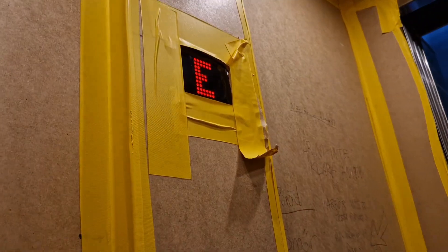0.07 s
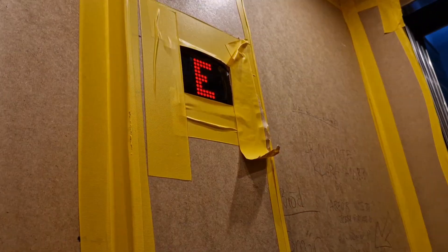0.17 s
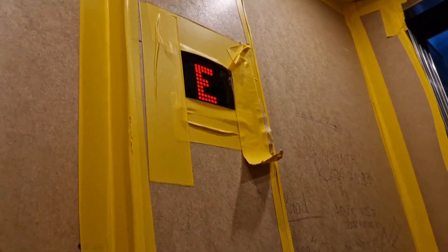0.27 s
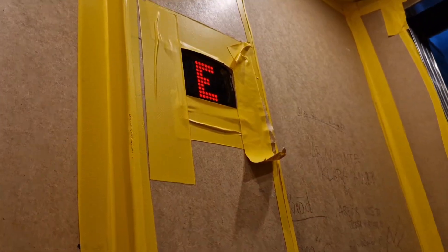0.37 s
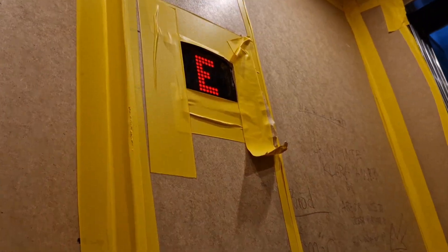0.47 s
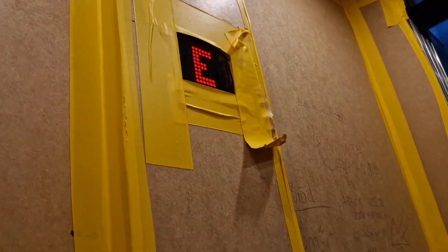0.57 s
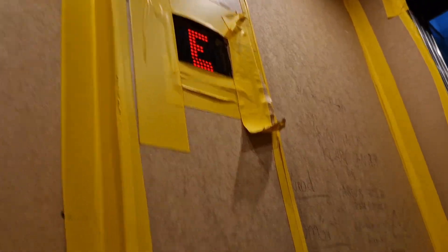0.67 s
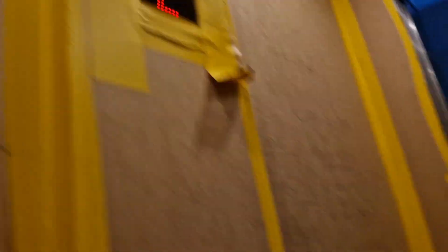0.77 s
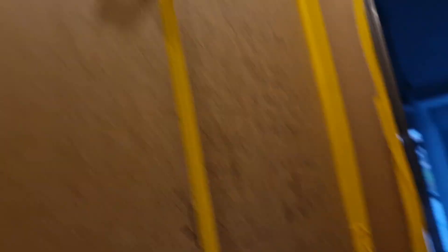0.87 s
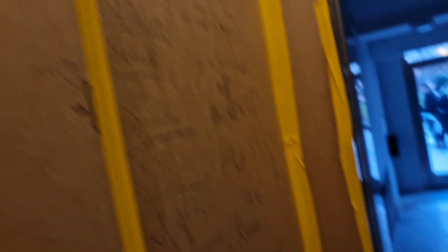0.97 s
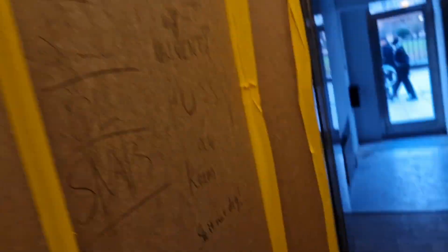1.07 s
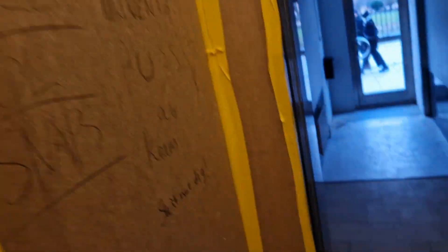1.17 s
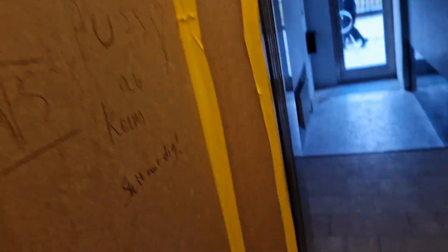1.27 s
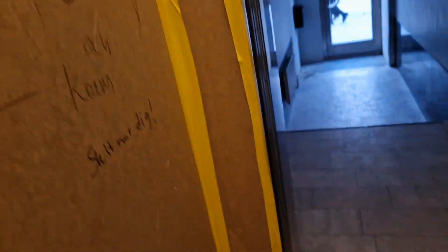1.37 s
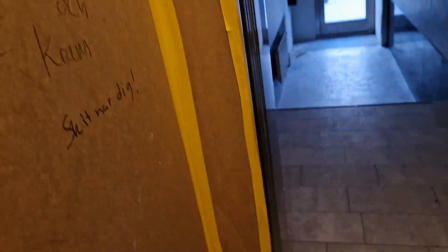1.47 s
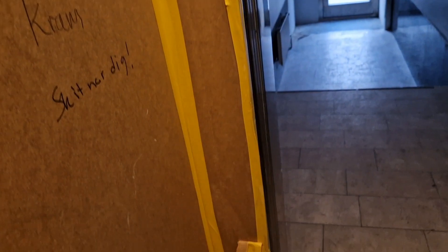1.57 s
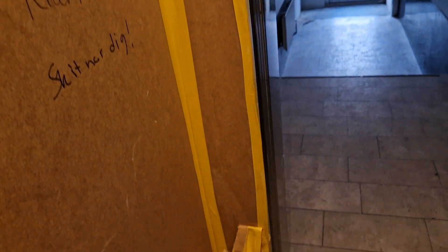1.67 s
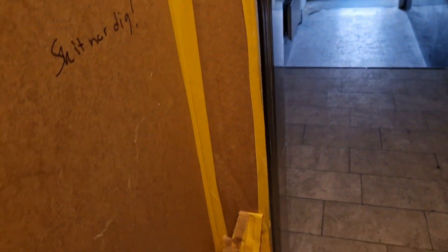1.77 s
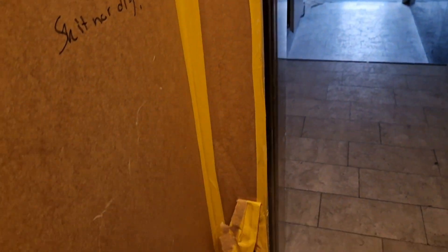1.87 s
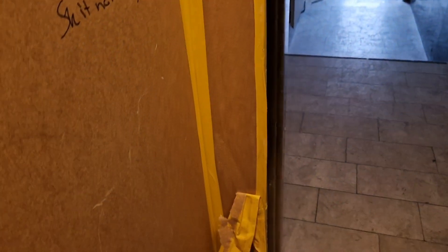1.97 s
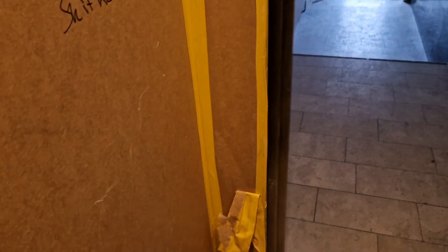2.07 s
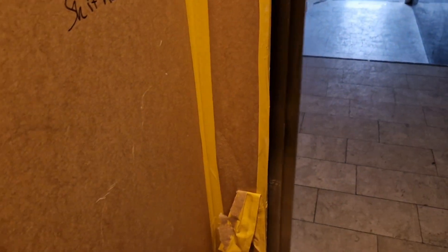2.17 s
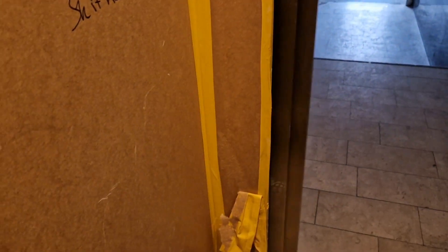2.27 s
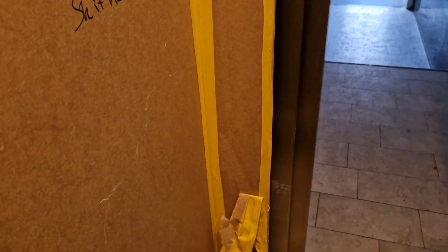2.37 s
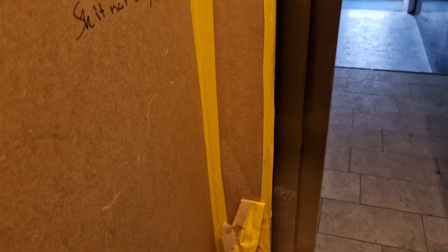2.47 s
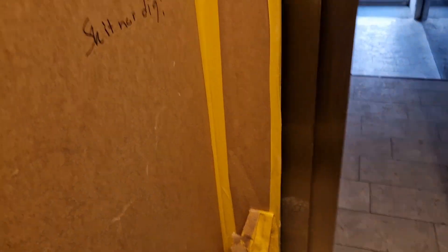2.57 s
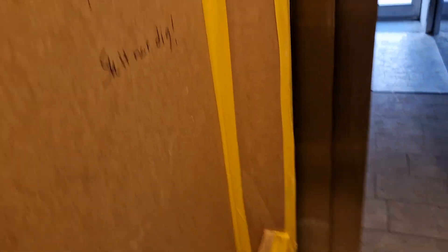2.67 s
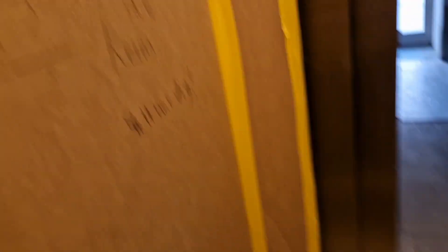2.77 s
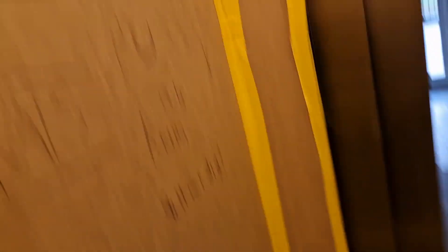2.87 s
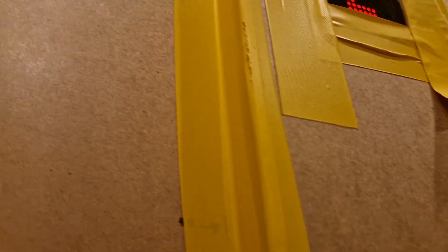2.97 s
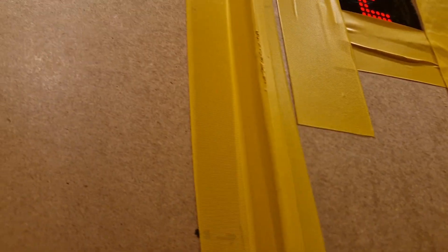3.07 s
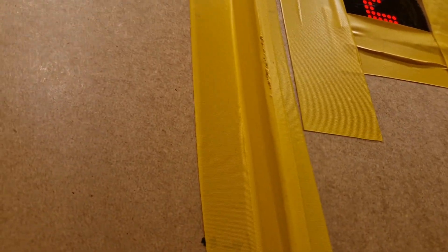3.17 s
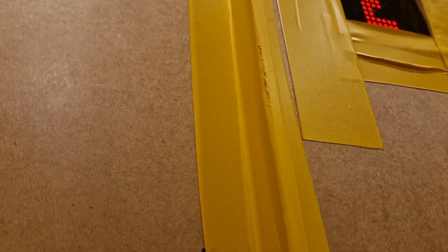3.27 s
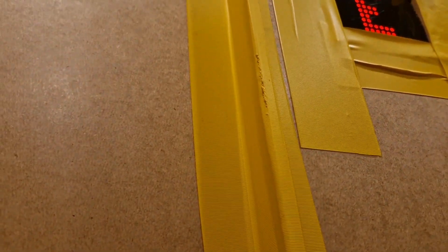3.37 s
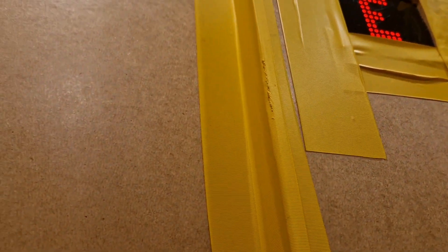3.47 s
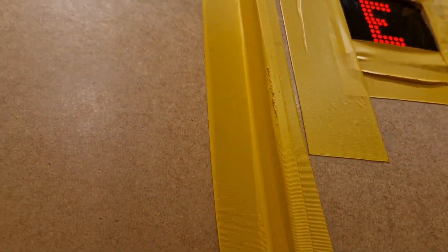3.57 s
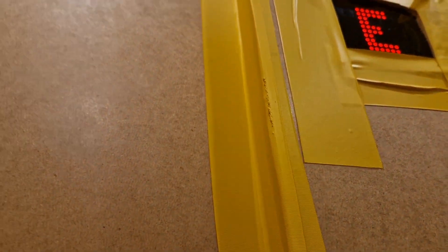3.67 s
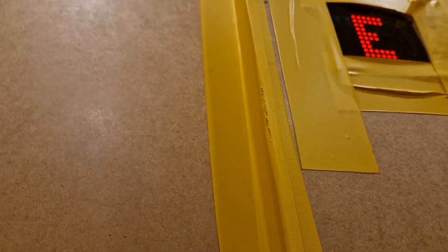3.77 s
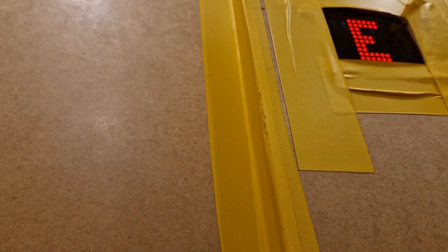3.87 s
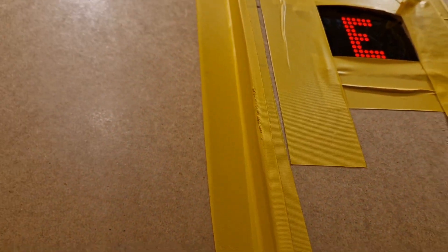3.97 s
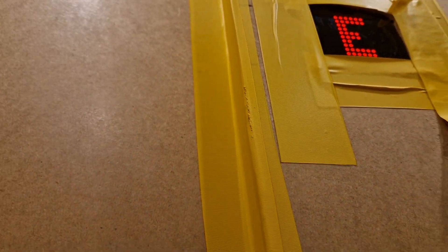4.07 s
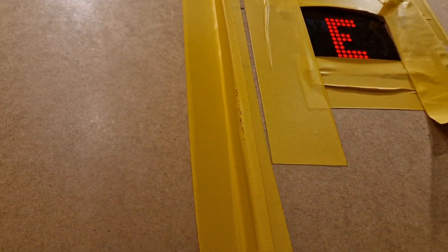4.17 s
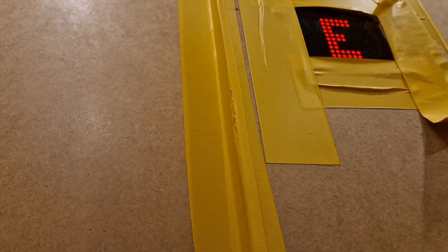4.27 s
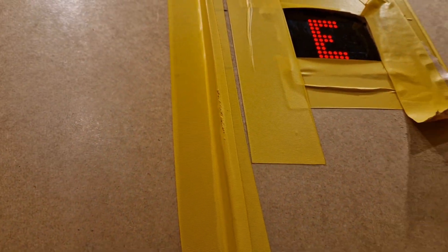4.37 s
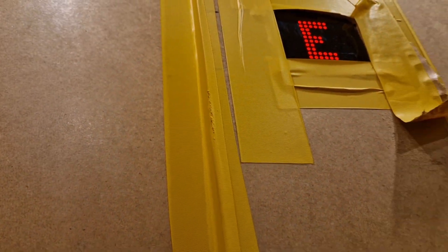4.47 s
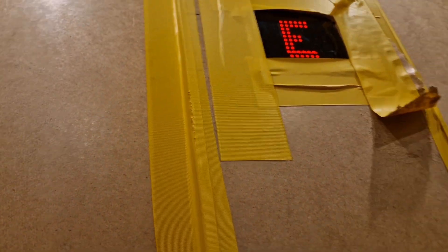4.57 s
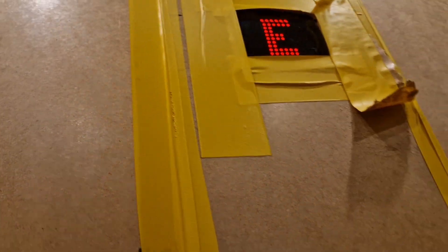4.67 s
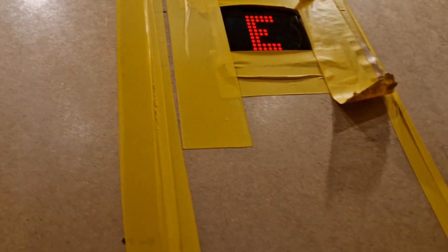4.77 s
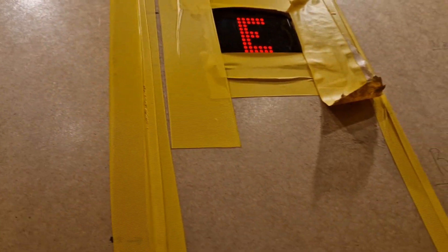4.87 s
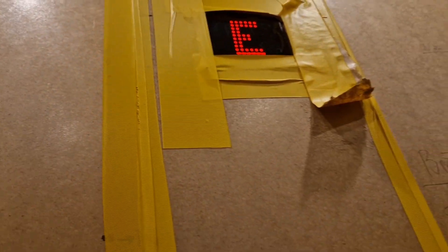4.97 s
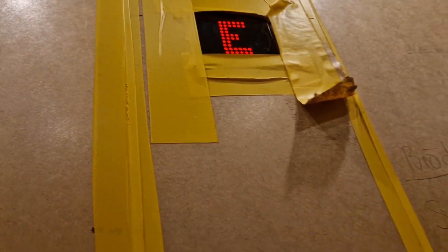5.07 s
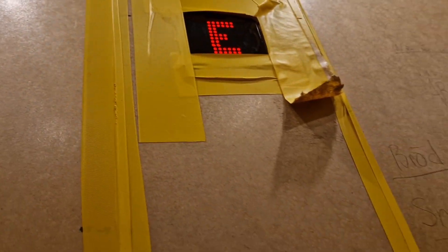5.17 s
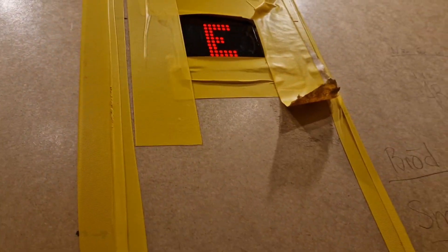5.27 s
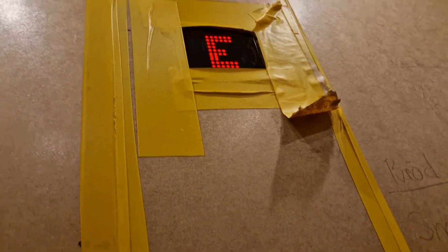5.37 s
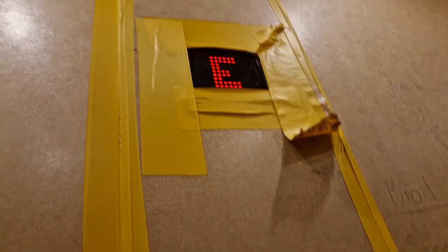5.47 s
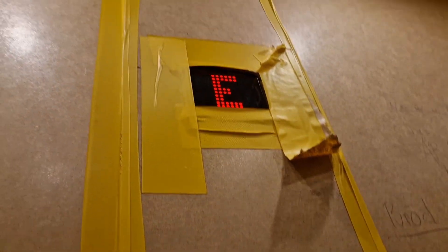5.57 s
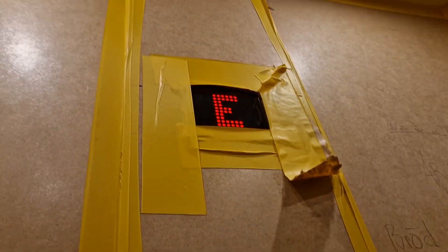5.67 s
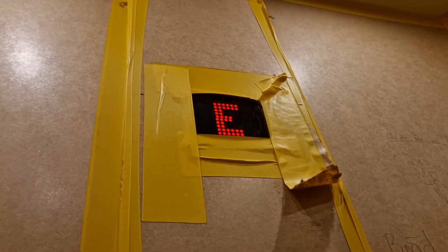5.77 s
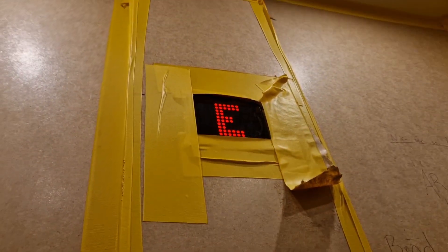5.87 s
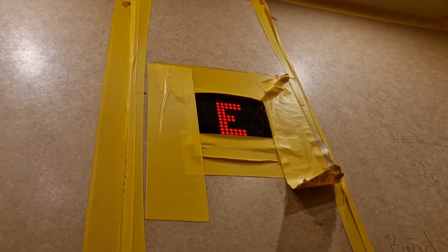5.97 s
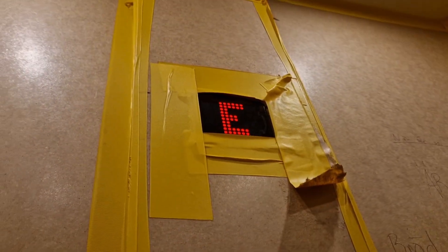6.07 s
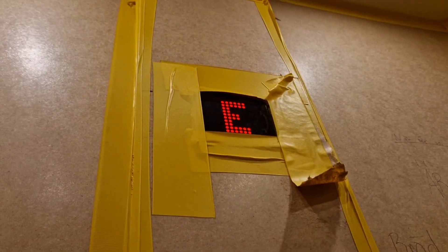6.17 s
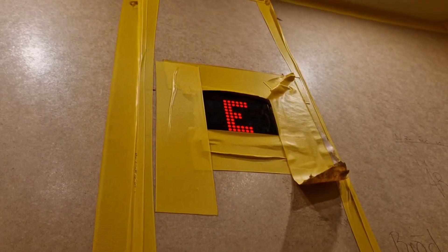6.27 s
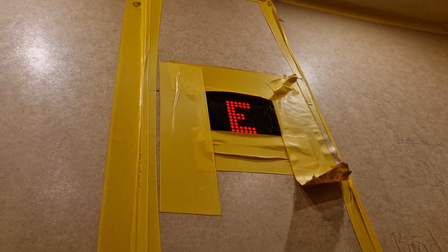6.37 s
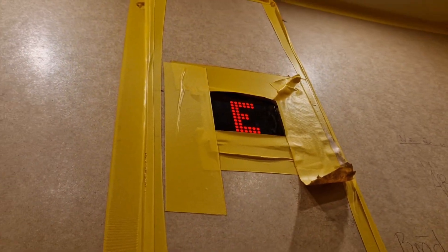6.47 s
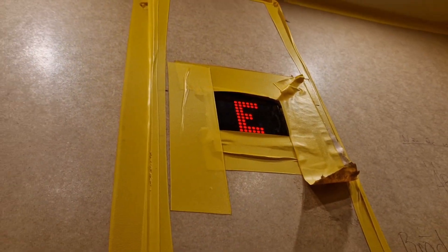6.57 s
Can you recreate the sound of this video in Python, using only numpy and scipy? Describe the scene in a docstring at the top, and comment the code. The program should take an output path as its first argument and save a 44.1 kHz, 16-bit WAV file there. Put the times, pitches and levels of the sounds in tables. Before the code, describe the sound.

A low building hum and close clothing rustle, with a few small ticks, open the scene inside an elevator car. At about 1.1 seconds a steel latch releases with a loud clack and a low thump, ringing briefly into the lobby. From 1.6 to 2.6 seconds the drive gives a run of sharp clicks while the sliding doors start to rumble and hiss along their track, with a harder knock at 2.6. The hiss drops away near 3 seconds as the doors brake, but the rumble continues. Between 3.9 and 4.6 seconds the doors knock home with clattering lock hooks and a deep thump. Another knock comes at 5 seconds, with a faint metallic ring, and the rumble fades. Clothing keeps rustling, mostly on the right. A hollow thump lands near 5.9 seconds, then a soft whir sets in until the end, around 6.6 seconds.

```python
"""Lift doors closing, from inside the car.

A steel latch lets go with a clack that carries into the stone lobby, and the drive ticks.
The sliding doors rumble and hiss along their track, knock home, and lock with bouncing hooks.
Car and closing doors give low hollow thumps. Clothing rustles close by as its fibres catch and slip,
over the hum of the building. A soft whir sets in at the end."""
import sys
import numpy as np
from scipy import signal
from scipy.fft import rfft, irfft, next_fast_len
from scipy.io import wavfile
from scipy.ndimage import uniform_filter1d

SR = 44100
rng = np.random.default_rng(int(sys.argv[2]) if len(sys.argv) > 2 else 0)


def to_wav(s):
    """Save 16-bit WAV."""
    ch = np.atleast_2d(s).T  # columns
    pcm = np.round(np.clip(ch, -1, 1) * 32767)  # PCM
    wavfile.write(sys.argv[1], SR, pcm.astype(np.int16))


N = 292373
TIME = np.arange(N) / SR
TOP_HZ, MODE_SCATTER_DB = 15900, 3.5

# Resonances of car, panels, hangers and track. Each row: frequency in Hz, width in Hz, gain in dB.
CAR_RESONANCES = [(33.43, 4.3, -0.5), (42.44, 5.3, 0), (51.64, 6, -6)]
PANEL_RESONANCES = [(82.34, 9.3, 6), (112.4, 12.1, 0), (140.7, 17, -20), (166.3, 8.9, -6.5)]
HANGER_RESONANCES = [(251.2, 12.8, 4.5), (295, 39.5, 3), (371, 28, 1), (467.4, 65, -3), (581, 58, -6.5),
                     (747, 270, -12.5)]
TRACK_RESONANCES = [(2140, 160, -11), (2690, 150, -9), (3270, 160, 1), (4980, 420, -0.5), (6360, 1000, -4),
                    (7270, 700, -4)]
# Modes of doors, drive housing and lock hooks. Each row: frequency in Hz, gain in dB, t60 in seconds.
DOOR_RING = [(263, -11, 0.12), (292.7, -8, 0.3), (366.5, -1, 0.2), (440, -3.5, 0.091), (604, -7.5, 0.068),
             (728, 4, 0.065), (833, 8.5, 0.025), (998, 1, 0.099), (1400, -25, 0.039), (1740, -15, 0.05),
             (2100, -11, 0.34), (2315, 12.5, 0.021), (2870, 12.5, 0.036), (3110, -2, 0.07), (3320, 9, 0.02),
             (3980, -5, 0.036), (4480, 3, 0.02), (5070, -14, 0.036)]
HOUSING_RING = [(1700, 2, 0.13), (2173, 4, 0.06), (2400, -5, 0.077), (3015, 3, 0.074), (3320, 3, 0.11)]
HOOK_RING = [(1850, -8, .09), (2260, -1, 0.11), (2795, 3, 0.11), (3182, -3, 0.14), (3370, -8, .11),
             (3950, -2, 0.063), (4380, -3, .1), (5023, -7, .11)]
# Modes of the latch. Each row: frequency in Hz, gain in dB.
LATCH_RING = [(533, -7), (727, -4), (1400, 4), (2654, -1), (4070, -4), (4280, -8), (4439, 3), (4625, 1),
              (4791, -3), (4883, 2), (5545, -8), (7039, -8), (7220, -2), (7440, -4), (8258, -16)]

# Spectra of the noise sources. Each row: frequency in Hz, gain in dB.
TRACK_SPECTRUM = [(300, -8), (550, 8), (1000, 2), (1350, 5), (2600, 2.5), (4000, 1.5), (5600, -1),
                  (8500, -10.5), (10000, -8.5), (16000, -9)]
CLACK_SPECTRUM = [(120, -30), (200, -3), (387, -29), (529, 0), (933, -4.5), (1370, -0.5), (1650, -12),
                  (1910, -2), (3620, -5), (4270, -4.5), (5840, -6), (7270, -2.5), (8740, -7.5), (11500, -7),
                  (16000, -21)]
LOBBY_SPECTRUM = [(180, -26), (300, -4), (749, -15), (1360, -2), (1840, -5.5), (4370, -0.5), (6000, -9),
                  (7440, -2), (8090, -6.5), (12500, -15), (16000, -23)]
CRACK_SPECTRUM = [(700, -1.5), (1600, -20), (3200, 9.5), (4300, -5), (6000, -1.5), (9000, 0), (12500, -5.5),
                  (16000, -5)]
SNAP_SPECTRUM = [(7000, -25), (11500, -13), (13300, -14), (14600, 1), (15200, -4), (17000, -9)]
HOUSING_SPECTRUM = [(600, 3.5), (1300, -5), (1750, 6.5), (2400, -2.5), (3200, 3.5), (4200, -12),
                    (6000, -11), (8800, -4.5), (11500, -12), (15000, -8.5)]
HOOK_SPECTRUM = [(1200, -24), (1900, -0.5), (2500, 1), (3600, -2), (5000, -11), (7000, -26), (16000, -36)]
TICK_SPECTRUM = [(250, 1), (600, 7.5), (1500, 6), (3200, 0), (7000, -12), (16000, -5)]
SLEEVE_SPECTRUM = [(300, 1), (600, 1.5), (1100, 3), (1700, 3), (2200, 3), (2700, 2.5), (3200, 2.5),
                   (4000, 0.5), (5000, -0.5), (7000, -6), (9000, -6.5), (13000, -0.5), (16000, -6)]
RUSTLE_SPECTRUM = [(400, 3), (800, 0), (1200, 3.5), (2300, -2), (4500, -1.5), (6700, -2.5), (8100, -11),
                   (9700, -3.5), (12000, 3.5), (14000, 1), (16000, 0)]
WHIR_SPECTRUM = [(600, -44), (1000, -2.5), (1200, -1.5), (1500, -5), (1800, -8), (2800, -13), (4000, -15),
                 (9000, -41)]
BUILDING_SPECTRUM = [(100, 0.5), (200, -10), (380, -19), (500, -4), (700, -18.5), (1200, -18.5),
                     (3000, -22), (6000, -25.5), (9500, -26), (16000, -29.5)]

# Doors start, speed up, brake to a stop, then gather speed until they shut.
# Each row: time in seconds, speed on a 0-1 scale.
DOOR_SPEED = [(1.7, 0.23), (1.771, 0.12), (2.28, 0.37), (2.65, 0.85), (2.915, 0.9), (2.98, 0.17), (3.2, 0),
              (4.52, 0.5)]
# Envelopes of the door rumble and the whir. Each row: time in seconds, level in dB.
RUMBLE_LEVEL = [(1.68, -52), (1.78, -31.5), (2.45, -33.5), (2.85, -27.5), (2.88, -31), (3.11, -27.5),
                (3.48, -34.5), (3.52, -48), (3.599, -35), (4.69, -28), (4.72, -40), (5.1, -33), (5.8, -66)]
WHIR_LEVEL = [(5.95, -100), (6.12, -65.5), (6.3, -62.5), (6.42, -57.5), (6.63, -62.5)]
# Jolts of the car. Each row: peak time and fall in seconds, then sway, boom and rattle in dB.
CAR_JOLTS = [(.1, 0.06, -54, -48.5, -62), (.29, 0.062, -36, -51, -57), (.58, 0.051, -42.5, -45, -62.5),
             (.92, 0.55, -49.5, -49, -55), (1.16, 0.067, -33.5, -37.5, -50.5),
             (1.33, 0.11, -40.5, -50, -57.5), (1.82, 0.079, -39, -43.5, -47.5),
             (2.25, 0.29, -52, -41.5, -51), (2.62, 0.06, -39, -34.5, -64), (3.07, 0.11, -39, -37, -56),
             (3.44, 0.12, -50.5, -48, -59), (3.93, 0.12, -43, -35, -51), (4.29, 0.056, -25.5, -35.5, -52),
             (5.04, 0.087, -50, -39, -48.5), (5.58, 0.074, -41, -64, -77), (5.86, 0.3, -59, -41.5, -70),
             (6.11, 0.048, -65, -42.5, -67), (6.39, 0.088, -44.5, -47.5, -62)]
# Door blows. Each row: start in seconds, panel in dB, frame in dB, frame pitch in Hz, metal in dB,
# chatter length in seconds, ring gain in dB.
DOOR_KNOCKS = [(1.867, -68, -40.5, 1060, -46, 0.0049, 2), (1.992, -38.5, -40, 560, -50.5, 0.034, -4),
               (2.377, -47, -45.5, 815, -47, 0.015, 2), (2.447, -42, -43.5, 630, -55, 0.0082, -3),
               (2.6322, -55, -31, 1620, -34.5, 0.0075, 3), (2.636, -51, -37.5, 800, -43, 0.0068, 8),
               (2.6445, -50, -39, 815, -45, 0.007, 0), (3.003, -41.5, -45, 635, -60, 0.018, -17),
               (3.028, -48, -50, 830, -60, 0.0071, -12), (3.88, -44, -52, 770, -46, 0.014, -3),
               (4.028, -45, -55, 710, -43, 0.016, 5), (4.146, -33, -40, 560, -42, 0.0045, -6),
               (4.149, -53, -41, 1290, -50, 0.0055, -6), (4.198, -36.5, -47, 590, -59, 0.016, 10),
               (4.418, -41, -43, 900, -46.5, 0.027, -5), (4.508, -33.5, -44, 566, -49, 0.017, 2),
               (4.521, -31.5, -38.5, 840, -38, 0.026, -1), (4.556, -34.5, -54, 585, -47, 0.021, 3.5),
               (5.006, -54, -38, 780, -53, 0.0068, 2), (5.021, -43.5, -46, 586, -61, 0.0089, -3)]
# Drive clicks, mostly in pairs. Each row: start in seconds, then crack, snap and housing ring in dB.
DRIVE_CLICKS = [(1.5814, -38.5, -44, -42.5), (1.7366, -38, -43, -44), (1.8105, -40, -41, -44),
                (1.868, -46, -56, -48), (1.958, -38.5, -35, -44), (2.0427, -41.5, -39, -43),
                (2.1578, -40, -34.5, -45), (2.2460, -42.5, -41, -44.5), (2.3633, -36.5, -41, -43),
                (2.4471, -41, -48, -46), (2.6246, -36, -37, -43)]
# Lock hooks dropping. Each row: start in seconds, level in dB, pitch ratio.
HOOK_DROPS = [(3.881, -36, 1.02), (4.028, -38.5, 0.94), (4.464, -43.5, .95)]
# Modes of car and door thumps. Each row: start in seconds, pitch in Hz, level in dB, t60 in seconds.
THUMP_MODES = [(.55, 67.6, -34.5, 0.46), (.835, 175, -36, 0.16), (1.014, 177, -29, 0.13),
               (1.154, 77.6, -17.5, 0.081), (1.159, 149, -31, 0.13), (1.809, 170, -31, 0.08),
               (1.825, 250, -38, 0.17), (3.868, 146, -34, 0.21), (4.148, 155.6, -25.5, 0.22),
               (4.517, 84.2, -20, 0.53), (4.525, 470, -43, 0.079), (4.535, 290, -42, 0.58),
               (5.005, 863, -26.5, 0.051), (5.019, 161, -26, 0.17), (5.025, 245, -36, .3),
               (5.87, 112, -19, 0.27), (5.884, 172, -34, 0.31), (5.9, 261, -40, 0.21)]
# Strokes of a sleeve and of clothing off to the right. Each row: peak time, rise and fall in
# seconds, then body, sheen and left minus right in dB.
SLEEVE_STROKES = [(.02, 0.063, 0.1, -49, -66, -8), (.3, 0.15, 0.23, -54.5, -63.5, -13.5),
                  (.57, 0.049, 0.034, -58.5, -60, -16), (.642, 0.035, 0.043, -49, -50.5, 4),
                  (.8, 0.091, 0.21, -45.5, -45, -7), (1.27, 0.23, 0.25, -45, -50.5, -4),
                  (1.505, 0.053, 0.045, -43.5, -52, -2), (1.68, 0.19, 0.39, -54, -60, -4.5),
                  (5.03, 0.09, 0.13, -48.5, -49, -9), (5.3, 0.33, 0.39, -49, -58, -5.5),
                  (5.505, 0.047, 0.085, -48.5, -48.5, 3), (5.585, 0.045, 0.067, -47, -50, 3.5),
                  (6.0, 0.14, 0.3, -65, -66.5, -7), (6.27, 0.1, 0.059, -55.5, -58.5, -3)]
RUSTLE_STROKES = [(2.72, 0.084, 0.061, -57, -50.5, -3), (2.905, .05, 0.015, -53, -61, -9),
                  (2.99, 0.089, 0.073, -54.5, -65, -6), (3.44, 0.09, 0.18, -62, -55, -9),
                  (3.94, 0.14, 0.056, -52.5, -53.5, -9.5), (4.23, 0.23, 0.2, -43.5, -44, -6.5),
                  (4.7, 0.9, 0.28, -55.5, -53.5, -8)]
# Scrapes and swishes. Each row: peak time in seconds, centre in Hz, glide in Hz per second,
# width in Hz, half-length in seconds, level in dB, left minus right in dB.
BRIEF_SCRAPES = [(0.84, 1207, -9, 1300, 0.18, -52.5, -6), (2.6, 5910, 9, 3800, 0.18, -52, -5),
                 (2.707, 8400, 0, 1850, 0.093, -57.5, -11), (2.86, 4960, 20, 5000, 0.043, -54.5, -8),
                 (3.077, 5580, 0, 700, 0.065, -65, -10), (3.432, 4500, 0, 2000, .02, -57, -3),
                 (4.353, 15500, 0, 500, .032, -43, -7), (4.421, 4500, 4, 900, 0.008, -43.5, -11),
                 (4.531, 5240, -2, 218, 0.018, -48, -11), (4.918, 4520, 0, 3000, .025, -58, 2.5),
                 (5.265, 612, 5, 397, 0.015, -53.5, -7), (5.242, 8800, 3000, 450, 0.096, -64, -14),
                 (5.36, 11550, 4000, 354, 0.052, -66, -7), (5.418, 10200, 6500, 400, 0.086, -64, -9),
                 (5.505, 4800, 0, 3500, 0.039, -49, 14), (6.27, 4210, 0, 4360, 0.02, -52, -6)]
# Small ticks. Each row: start in seconds, level in dB, low and high cut in Hz, left minus right in dB.
DRY_TICKS = [(.085, -45.5, 100, 500, 0), (.212, -49.5, 300, 4000, -12), (.28, -54, 100, 2500, 14),
             (.335, -54, 99, 2500, 8), (0.6158, -36, 140, 13000, 10), (1.269, -40, 3000, 14000, 0),
             (1.487, -41, 3500, 15000, 7), (2.921, -47, 150, 5000, -3), (5.7444, -46.5, 400, 5500, 13)]

# Diffuse field of the car. Each row: frequency in Hz, correlation of left and right.
STEREO_CORRELATION = [(30, 0.97), (125, 0.97), (250, 0.91), (500, 0.6), (1000, 0.016), (16000, 0.0081)]
# Colour of the two microphone ports. Each row: frequency in Hz, left minus right in dB.
PORT_BALANCE = [(100, -0.5), (250, -0.5), (500, 1.5), (1200, 2), (2500, 0), (4000, -1), (5500, -2.5),
                (7500, -3.5), (9500, 8), (13000, -3), (16000, 10)]


def rolling():
    """Rollers bump along the track: car sways, panels boom, hangers rattle. Jolts ring the same parts."""
    rumble = undb(curve(RUMBLE_LEVEL))
    rumble *= hold(RUMBLE_LEVEL[0][0], RUMBLE_LEVEL[-1][0], attack_s=0.044, release_s=0.059)
    judder = hold(4.14, 4.56, attack_s=0.051, release_s=0.027)  # panels shake as they close up
    jolts = (swell(s, 0.074, fall_s) * undb(levels_db)[:, None] for s, fall_s, *levels_db in CAR_JOLTS)
    jolt_sway, jolt_boom, jolt_rattle = power_sum(*jolts)
    idle_sway, idle_boom, idle_rattle = undb([-48.5, -57, -67])
    sway_gain = power_sum(idle_sway, rumble, jolt_sway)
    boom_gain = power_sum(idle_boom, rumble * undb(-12.5), jolt_boom, judder * undb(-36.5))
    rattle_gain = power_sum(idle_rattle, rumble * undb(-31.5), jolt_rattle, judder * undb(-45),
                            np.sqrt(door_speed()) * undb(-53.5))
    bumps = diffuse(N)
    sway = resonate(bumps, CAR_RESONANCES, steady_s=0.26) * sway_gain
    boom = resonate(bumps, PANEL_RESONANCES, steady_s=0.1) * boom_gain
    rattle = resonate(bumps * flicker(1.8, 60), HANGER_RESONANCES, steady_s=0.49) * rattle_gain
    return sway + boom * pan(-0.42) + rattle * pan(-2.1)


def track_hiss():
    """The track hisses with door speed and drops away as the brake bites."""
    braked = np.clip((TIME - 2.924) / 0.0036, 0, 1)
    run = door_speed() * undb(-23 * braked) * pan(-5)
    return rubbing(run * undb(-49.5), run * undb(-53.5), TRACK_SPECTRUM, grain_db=1.5)


def door_knocks():
    """Each blow chatters and rings panel, frame and fittings; where it lands sets the frame pitch."""
    out, t = np.zeros((2, N)), np.arange(SR // 2) / SR
    ring = sum(undb(db) * np.sin(2 * np.pi * hz * t) * fade(t, t60_s) for hz, db, t60_s in DOOR_RING)
    for s, panel_db, frame_db, frame_hz, metal_db, chatter_s, ring_db in DOOR_KNOCKS:
        wall_echo = undb(-11) * fade(t, 0.31)
        onset = rise(t, 0.052 * chatter_s)  # longer contacts start more softly
        push = (np.exp(-(t / chatter_s) ** 2) + wall_echo) * onset
        blow = diffuse(len(t)) * push * flicker(2.26, 630, len(t))
        rung = unit(signal.fftconvolve(blow, ring[None], axes=1)[:, :len(t)])
        knock = rung * undb(ring_db) + unit(blow) * undb(10.5)
        panel = crest(band(knock, [270, 530], "bandpass")) * undb(panel_db)
        frame = crest(band(knock, [frame_hz / 1.46, frame_hz * 1.64], "bandpass")) * undb(frame_db)
        metal = crest(band(knock, [1600, 5400], "bandpass")) * undb(metal_db)
        add(out, s, (panel + frame) * pan(-2.5) + metal)
    return out


def latch():
    """Loose steel parts clash for some hundredths of a second; the steel and the lobby ring on."""
    out, t = np.zeros((2, N)), np.arange(SR) / SR
    clash = np.interp(t, [0, 0.006, 0.024, 0.04, 0.07], [0.04, 0.92, 0.91, 0.32, 0.0053])
    clash *= flicker(1, 770, SR)
    clack = shape(diffuse(SR) * clash, CLACK_SPECTRUM)
    add(out, 1.078, crest(clack) * undb(-24) * pan(-2.2))
    echo = shape(diffuse(SR), LOBBY_SPECTRUM) * rise(t, 0.018) * fade(t, 0.71) * flicker(1.2, 92, SR)
    add(out, 1.095, crest(echo) * undb(-36) * pan(-3.8))
    steel = sum(undb(db) * stereo_sine(t, hz) for hz, db in LATCH_RING)
    steel *= flicker(3.2, 55, SR)  # loose parts ring unevenly
    add(out, 1.085, crest(steel * fade(t, 0.55)) * undb(-41))
    return out


def drive_clicks():
    """The drive snaps sharply and its housing rings briefly, a little differently each time."""
    out, t = np.zeros((2, N)), np.arange(SR // 4) / SR
    for s, crack_db, snap_db, ring_db in DRIVE_CLICKS:
        crack = burst(fade(t, 0.017), CRACK_SPECTRUM) * pan(1.1)
        snap = burst(fade(t, 0.011) + undb(-24) * fade(t, 0.09), SNAP_SPECTRUM)
        clatter = burst(rise(t, 0.0011) * fade(t, 0.18), HOUSING_SPECTRUM)
        modes = crest(struck_modes(t, HOUSING_RING))
        ring = (clatter * undb(0.5) + modes * undb(-1)) * pan(-3.3)
        add(out, s, crack * undb(crack_db) + snap * undb(snap_db) + ring * undb(ring_db))
    return out


def lock_hooks(contacts=6, mean_gap_s=0.0046, bounce_loss_db=3.5):
    """A steel hook bounces on its catch, ringing at each contact; the loose linkage clatters."""
    out, t = np.zeros((2, N)), np.arange(SR // 3) / SR
    for s, db, pitch_ratio in HOOK_DROPS:
        ring = np.zeros((2, N))
        gaps_s = mean_gap_s * rng.uniform(0.5, 1.5, contacts)
        for bounce, delay_s in enumerate(np.cumsum(gaps_s) - gaps_s[0]):
            add(ring, delay_s, struck_modes(t, HOOK_RING, pitch_ratio) * undb(-bounce_loss_db * bounce))
        shake = rise(t, 0.0018) * fade(t, 0.125) * flicker(2.5, 400, len(t))
        drop = burst(shake, HOOK_SPECTRUM) + crest(ring[:, :len(t)]) * undb(-5)
        add(out, s, crest(drop) * undb(db) * pan(-2.6))
    return out


def thumps():
    """Low hollow thumps of the car and closing doors; each row is one mode."""
    out, t = np.zeros((2, N)), np.arange(SR // 2) / SR
    for s, hz, db, t60_s in THUMP_MODES:
        mode = np.sin(2 * np.pi * hz * t) * rise(t, 0.055 * t60_s) * fade(t, t60_s)
        add(out, s, mode * undb(db) * pan(-1.1))
    return out


def scrapes():
    """Surfaces catch for a moment: narrow bands squeak and glide, broad ones swish."""
    out, t = np.zeros((2, N)), np.arange(SR // 2) / SR - 0.25
    for s, hz, glide_hz_per_s, width_hz, half_length_s, db, pan_db in BRIEF_SCRAPES:
        wobble = band(diffuse(len(t)) + 1j * diffuse(len(t)), width_hz / 2, "lowpass")
        cycles = hz * t + glide_hz_per_s * t ** 2 / 2
        tone = unit(np.real(wobble * np.exp(2j * np.pi * cycles)))
        scrape = tone * np.exp(-(t / half_length_s) ** 2) * undb(db) * pan(pan_db)
        add(out, s + t[0], scrape[:, s + t >= 0])
    return out


def track_ring():
    """A last scrape as the doors lock makes the metal track sing faintly."""
    ring = unit(resonate(diffuse(N), TRACK_RESONANCES, steady_s=0.2))
    return ring * swell(5.08, rise_s=0.22, fall_s=0.54) * undb(-55) * pan(-8.5)


def ticks():
    """Small dry ticks, some close to one side."""
    out, t = np.zeros((2, N)), np.arange(SR // 4) / SR
    for s, db, low_hz, high_hz, pan_db in DRY_TICKS:
        tick = burst(fade(t, 0.0046), TICK_SPECTRUM)
        tick = band(tick, [low_hz, high_hz], "bandpass", order=1)
        add(out, s, crest(tick * pan(pan_db)) * undb(db))
    return out


def sleeve():
    """Sleeve fibres catch and slip with each stroke."""
    return rubbing(*strokes(SLEEVE_STROKES), SLEEVE_SPECTRUM, grain_db=1)


def clothing_rustle():
    """Clothing rustles off to the right, swelling in strokes."""
    steady = hold(2.93, 4.98, attack_s=0.026, release_s=0.045) * pan(-8.5)
    body, sheen = strokes(RUSTLE_STROKES)
    body = power_sum(body, steady * undb(-59))
    sheen = power_sum(sheen, steady * undb(-58.5))
    return rubbing(body, sheen, RUSTLE_SPECTRUM, grain_db=0.5)


def whir():
    """A soft midrange whir sets in at the end."""
    return unit(shape(diffuse(N), WHIR_SPECTRUM)) * undb(curve(WHIR_LEVEL)) * flicker(0.85, 54) * pan(-6)


def building_hum():
    """The air of the building: low, slowly wavering noise."""
    return unit(shape(diffuse(N), BUILDING_SPECTRUM)) * undb(-59) * flicker(2, 4.9) * pan(-6)


def door_speed():
    """Door speed, 0 to 1; zero outside the run."""
    return np.interp(TIME, *np.transpose(DOOR_SPEED), left=0, right=0)


def rubbing(body, sheen, spectrum, grain_db, split_hz=7600):
    """Countless tiny catches and slips: body below the split, sheen above."""
    slips = shape(diffuse(N) * flicker(grain_db, 1500) * flicker(0.7, 35), spectrum)
    return unit(band(slips, split_hz, "lowpass")) * body + unit(band(slips, split_hz, "highpass")) * sheen


def strokes(table):
    """Stereo gains of body and sheen for a run of rubbing strokes."""
    body, sheen = 0, 0
    for s, rise_s, fall_s, body_db, sheen_db, pan_db in table:
        stroke = swell(s, rise_s, fall_s) * pan(pan_db)
        body = power_sum(body, stroke * undb(body_db))
        sheen = power_sum(sheen, stroke * undb(sheen_db))
    return body, sheen


def resonate(x, resonances, steady_s):
    """Ring steep resonances and even out their joint level."""
    y = 0
    for hz, width_hz, db in resonances:
        b, a = signal.iirpeak(hz, hz / (1.65 * width_hz), fs=SR)  # two passes narrow the peak
        y = y + undb(db) * signal.lfilter(b, a, signal.lfilter(b, a, x))
    window = int(steady_s * SR)
    power = uniform_filter1d(uniform_filter1d(np.mean(y ** 2, axis=0), window), window)
    return y / np.sqrt(power + 1e-12)


def struck_modes(t, modes, pitch_ratio=1):
    """Decaying modes, their levels scattered anew at each strike."""
    return sum(undb(db + MODE_SCATTER_DB * rng.standard_normal())
               * stereo_sine(t, hz * pitch_ratio) * fade(t, t60_s) for hz, db, t60_s in modes)


def stereo_sine(t, hz):
    """Sine with a random phase on each side."""
    return np.sin(2 * np.pi * hz * t + rng.uniform(0, 2 * np.pi, (2, 1)))


def burst(envelope, spectrum):
    """Coloured noise burst, rms 1 at its loudest."""
    return crest(shape(diffuse(len(envelope)) * envelope, spectrum))


def diffuse(n):
    """Stereo noise: alike in the bass, unrelated in the treble."""
    size = next_fast_len(n)
    alike = np.clip(along(STEREO_CORRELATION, np.fft.rfftfreq(size, 1 / SR)), 0, 1)
    mid, side = rfft(rng.standard_normal((2, size)))
    mid, side = mid * np.sqrt(1 + alike), side * np.sqrt(1 - alike)
    return unit(irfft(np.array([mid + side, mid - side]), size)[:, :n])


def flicker(spread_db, rate_hz, n=N):
    """Smooth random gain."""
    step = int(SR / rate_hz)
    stairs = np.repeat(rng.standard_normal(N // step + 1), step)
    return undb(spread_db * unit(uniform_filter1d(stairs, step)[:N])[:n])


def shape(x, spectrum):
    """Apply a spectrum, padded against wrap-round."""
    n = x.shape[-1]
    size = next_fast_len(n + SR // 10)
    gain = undb(along(spectrum, np.fft.rfftfreq(size, 1 / SR)))
    return irfft(rfft(x, size) * gain, size)[..., :n]


def band(x, hz, kind, order=4):
    """Flat-passband filter."""
    return signal.sosfilt(signal.butter(order, hz, kind, fs=SR, output="sos"), x)


def along(points, hz):
    """Interpolate on a log-frequency axis."""
    points_hz, values = np.transpose(points)
    return np.interp(np.log(hz + 1), np.log(points_hz), values)


def curve(points):
    """Interpolate over time."""
    return np.interp(TIME, *np.transpose(points))


def swell(s, rise_s, fall_s):
    """Smooth rise to 1 at time s, smooth fall."""
    return np.exp(-np.minimum(((TIME - s) / np.where(TIME < s, rise_s, fall_s)) ** 2, 20))


def hold(from_s, to_s, attack_s, release_s):
    """Attack, hold at 1, release."""
    return np.clip(np.minimum((TIME - from_s) / attack_s, (to_s - TIME) / release_s) + 1, 0, 1)


def rise(t, tau_s):
    """Exponential onset."""
    return 1 - np.exp(-t / tau_s)


def fade(t, t60_s):
    """Exponential decay."""
    return np.exp(-np.log(1000) * t / t60_s)


def power_sum(*gains):
    """Unrelated pushes add in power."""
    return np.sqrt(sum(g ** 2 for g in gains))


def undb(db):
    """Decibels to gain."""
    return 10 ** (np.asarray(db) / 20)


def pan(db):
    """Stereo gains for a left minus right difference."""
    return undb(np.array([[1], [-1]]) * db / 2)


def unit(x):
    """Scale to rms 1."""
    return x / np.sqrt(np.mean(x ** 2))


def crest(x):
    """Scale the loudest 10 ms to rms 1."""
    return x / np.sqrt(uniform_filter1d(np.mean(x ** 2, axis=0), SR // 100).max())


def add(out, s, sound):
    """Mix a sound in at time s."""
    i = max(int(s * SR), 0)
    out[:, i:i + sound.shape[1]] += sound[:, :N - i]


def scene():
    """Doors and small noises of the car over building hum, whir and clothing."""
    background = building_hum() + whir() + sleeve()
    return (rolling() + latch() + drive_clicks() + ticks() + door_knocks() + lock_hooks()
            + thumps() + scrapes() + track_hiss() + clothing_rustle() + track_ring() + background)


def record(dry):
    """Each port adds its colour; the microphone drops the deepest bass and the very top."""
    left = shape(dry[0], [(hz, db / 2) for hz, db in PORT_BALANCE])
    right = shape(dry[1], [(hz, -db / 2) for hz, db in PORT_BALANCE])
    stereo = band(np.array([left, right]), 18, "highpass", order=2)
    return signal.sosfilt(signal.ellip(10, 0.2, 70, TOP_HZ, fs=SR, output="sos"), stereo)


dry = scene()
out = record(dry)
to_wav(out)
```